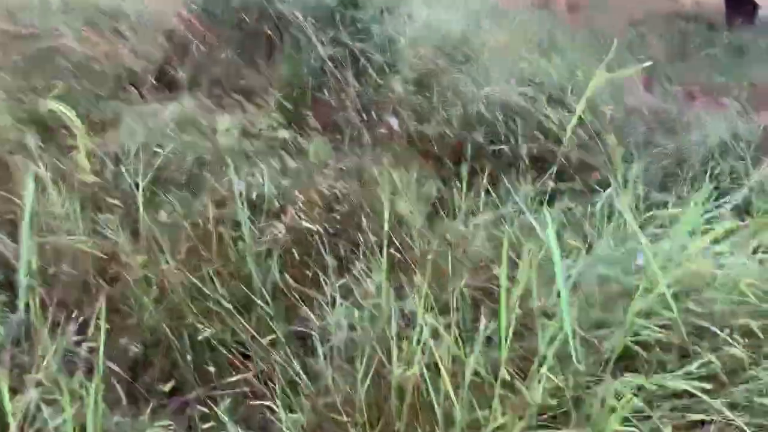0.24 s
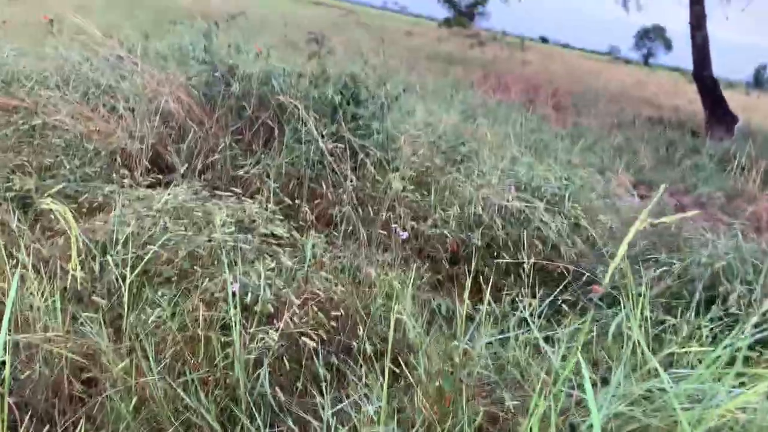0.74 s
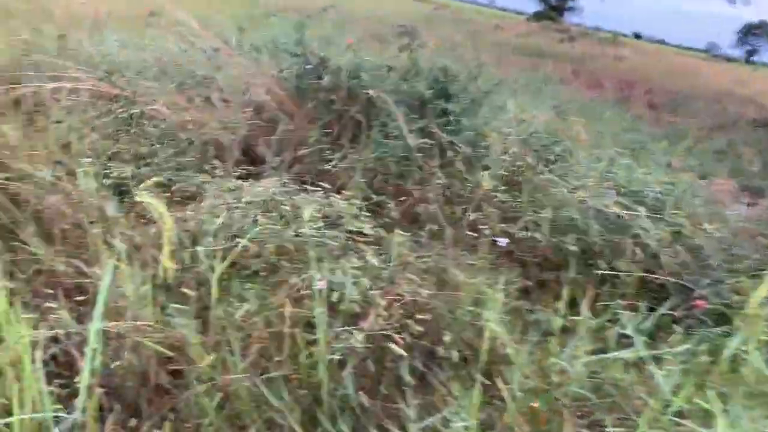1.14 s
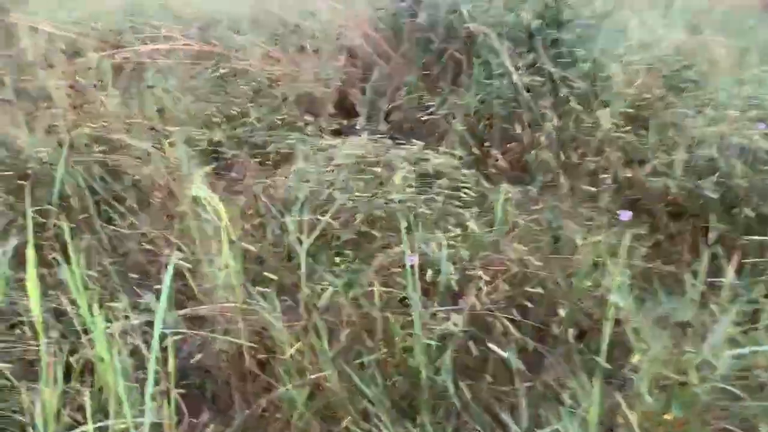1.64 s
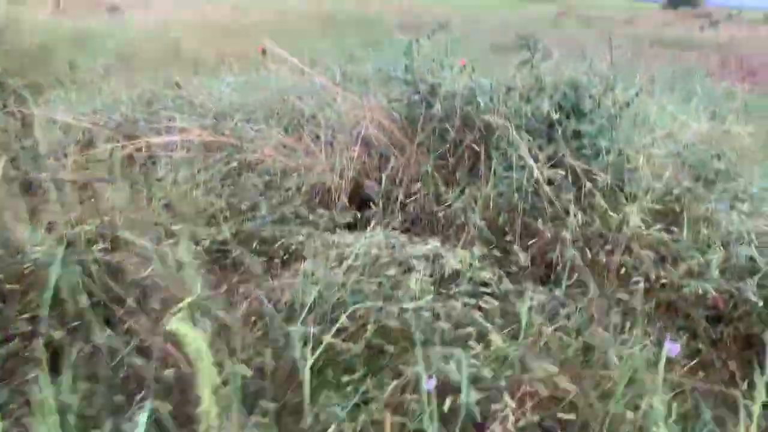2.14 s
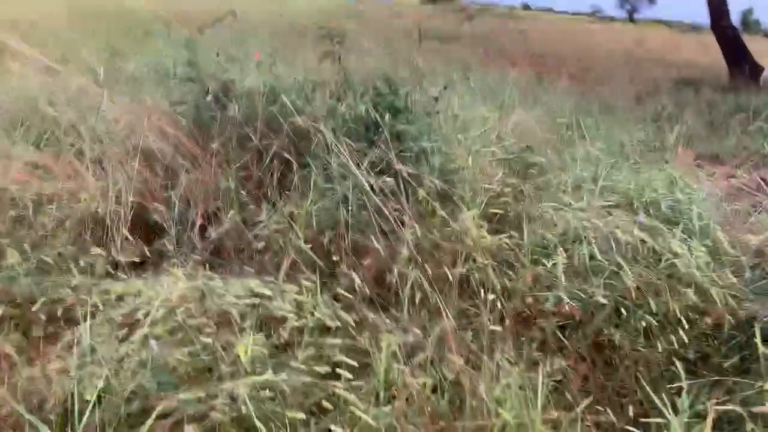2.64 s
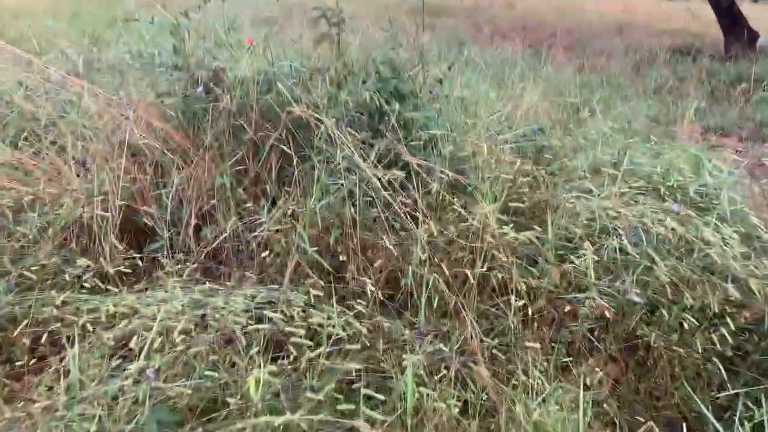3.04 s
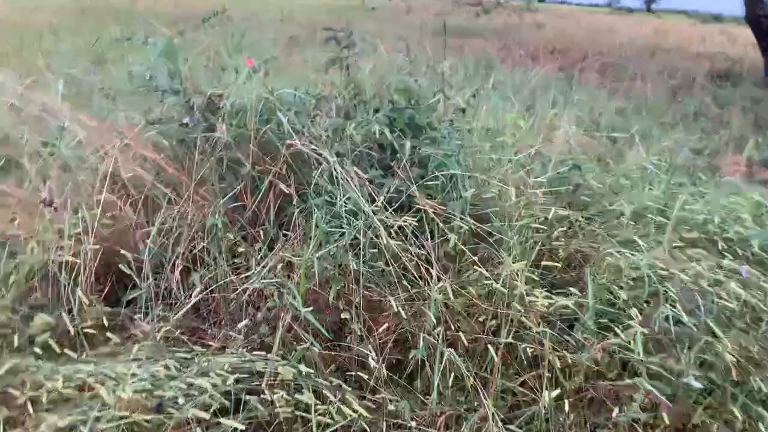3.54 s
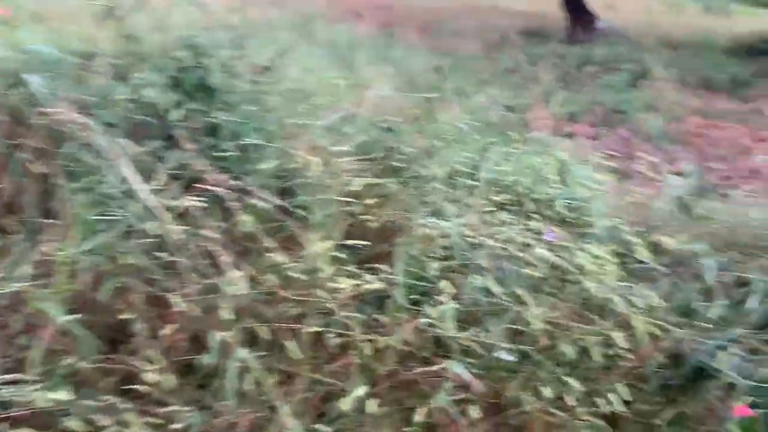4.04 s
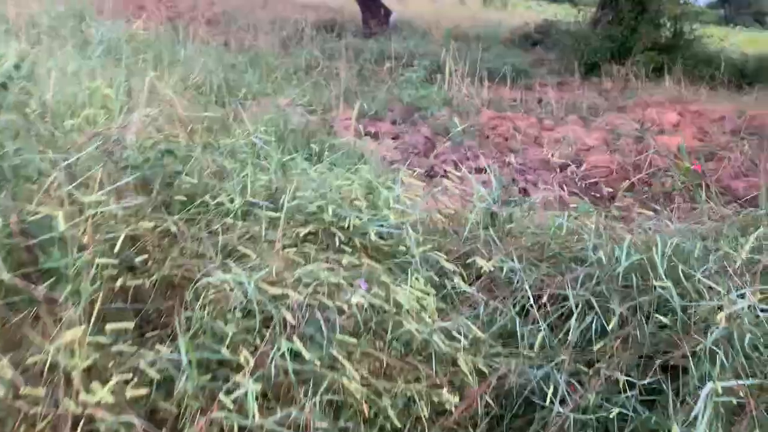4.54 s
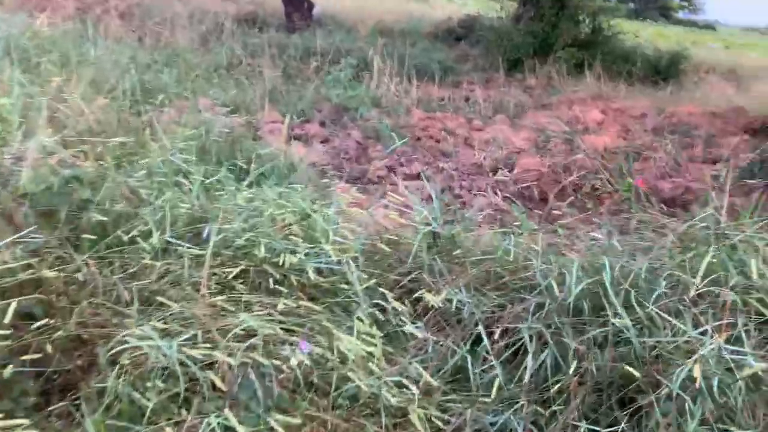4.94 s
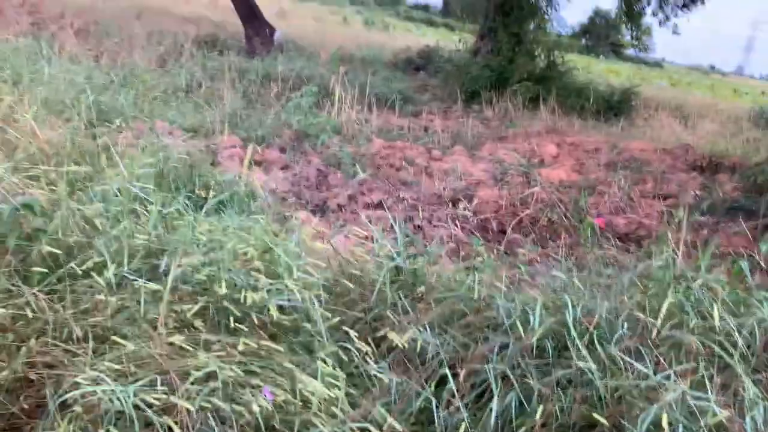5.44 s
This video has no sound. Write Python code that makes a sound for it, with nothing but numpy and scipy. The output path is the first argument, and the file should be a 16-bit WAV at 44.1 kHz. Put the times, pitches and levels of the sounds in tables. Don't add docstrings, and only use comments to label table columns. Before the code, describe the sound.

Dry grass brushes and crackles around a walker's legs over low wind rumble, hollow handling thumps, a quick cricket and faint insect drone.

```python
import sys
import numpy as np
from scipy import signal
from scipy.io import wavfile
from scipy.ndimage import uniform_filter1d

SR = 44100
rng = np.random.default_rng(int(sys.argv[2]) if len(sys.argv) > 2 else 0)


def elevation(decibels):
    levels = np.asarray(decibels, float)
    return 10 ** (levels / 20)


def materialize(psi):
    bounded = np.clip(np.atleast_2d(psi).T, -1, 1)
    quanta = np.round(bounded * 32767).astype(np.int16)
    wavfile.write(sys.argv[1], SR, quanta)


N = 250488

# peak time in seconds, level in dB, rise in seconds,
# fall in seconds, stalk level over it in dB.
SWISHES = [(0, -76.5, 0.14, 0.91, 6.5), (.26, -79.5, 0.23, 0.87, 4), (0.958, -59.5, 0.26, 0.39, -3),
           (1.015, -57.5, 0.13, 0.37, -5), (1.14, -63.5, .2, 0.99, -0.5), (1.501, -72, 0.042, 0.14, 24.5),
           (1.848, -74.5, 0.48, 0.31, 3), (2.101, -71, 0.42, 0.13, 11), (2.138, -47.5, 0.052, 0.14, -2),
           (2.46, -61.5, 0.21, 0.21, 10.5), (2.68, -74.5, 0.78, 0.73, 3.5), (2.82, -67, 0.073, 0.3, -10),
           (3.019, -66, 0.091, 1, 0), (3.24, -66, 1, 0.22, 4.5), (3.31, -67, 0.1, 0.17, 7.5),
           (3.48, -70, 0.12, 0.17, 8.5), (3.62, -76.5, 0.13, 0.43, 2), (3.92, -72.5, 0.16, 0.046, 5),
           (4.0, -75.5, 0.11, 0.22, 7.5), (4.141, -66, 0.31, 0.61, 4), (4.3, -72.5, 0.22, 0.18, -19),
           (4.44, -77.5, 0.074, 0.18, 3.5), (4.621, -76, 0.27, 0.18, 6.5), (4.982, -78.5, 0.61, 1, 4.5),
           (5.67, -84, 0.11, 0.09, 10.5)]
# peak time in seconds, level in dB, fall in seconds.
WHIPS = [(0.535, -65, 0.016), (1.922, -68, 0.017), (4.605, -62, .02), (0.64, -52.5, 0.032),
         (1.238, -58, 0.25), (1.5, -49.5, 0.18), (2.118, -52, 0.018), (2.124, -39.5, 0.058),
         (.05, -68, .03), (.198, -69.5, .02), (3.563, -62, .02), (.9, -61.5, .5), (1.15, -62, .4),
         (1.615, -60, .04), (2.14, -47, 0.21), (2.795, -53, 0.033)]
# frequency in Hz, width in Hz, level in dB.
STALK_MODES = [(1647, 1830, 14.54), (837, 1500, 11.7)]
BLADE_MODES = [(2520, 1100, -2), (4266, 1400, 0.06)]
LEAF_MODES = [(8880, 1600, 2.9), (11110, 940, 12.4), (6580, 5500, 11.8)]
# start in seconds, length in seconds, level in dB,
# pitch in Hz, end pitch over start pitch as a ratio.
RASPS = [(.97, 0.086, -60, 3500, 1.1), (.99, .06, -62, 2600, 1.4), (2.135, 0.074, -67, 3100, 1.14),
         (2.13, 0.072, -60.5, 4240, 1), (2.778, 0.016, -52, 1400, 1.14), (3.045, .045, -67, 1420, 0.78),
         (3.105, 0.118, -62.5, 1450, 1.23), (3.28, 0.066, -57.5, 1390, 1.2), (4.04, .09, -67, 1120, 1.37),
         (4.085, 0.046, -72, 4200, 1), (4.14, .13, -66.5, 1780, 0.9), (4.17, 0.069, -66.5, 2650, 0.98),
         (1.5, 0.11, -61, 2040, 0.91), (0.7, .03, -70, 1120, .9), (3.803, 0.04, -68, 1340, 1),
         (2.42, .07, -57, 1380, 1.12), (0.015, 0.026, -68.5, 1430, 1.02), (.594, .02, -71, 1300, 1),
         (1.606, .025, -62, 1300, 0.9), (1.801, .025, -65, 1420, 1), (4.453, 0.032, -61.5, 1320, 0.88),
         (4.6, .03, -63, 1200, 1), (1.52, .07, -66, 2600, .95), (2.122, 0.019, -59, 1670, 1.2)]
# start in seconds, length in seconds,
# level in dB, pitch in Hz, end pitch over start pitch as a ratio.
STUBBLE = [
    (1.495, 0.082, -55, 3400, 0.95),
    (1.495, 0.093, -61, 2500, 0.86),
    (2.125, 0.12, -53, 1140, 0.96),
    (2.125, .08, -56, 2400, 0.97),
]
# time in seconds, peak in dB, stem ring in Hz, fizz level over it in dB.
SNAPS = [(0.2458, -48, 2540, -32), (0.6365, -49, 4520, -2), (1.2344, -51, 1710, 0),
         (1.3478, -40, 1560, -16), (1.387, -54, 4500, 0), (1.615, -54, 1200, -1), (0.8916, -55, 3640, -14),
         (1.4924, -42, 1000, -10), (1.5, -42, 2050, -9), (2.1216, -41, 3460, -10), (2.1314, -40, 4080, -8),
         (2.4234, -43, 1420, -20), (2.4364, -33, 1500, -28), (2.7916, -39, 1260, -10),
         (2.7954, -36, 1180, -5), (2.8094, -44, 3500, -3), (2.8105, -44, 1200, -20),
         (2.8025, -52, 1500, -4), (2.8194, -47, 1530, -12), (2.8314, -51, 1540, -10),
         (2.9736, -56, 1020, -2), (3.0227, -52, 1520, -18), (3.0546, -50, 1430, -18),
         (3.1078, -49, 1450, -14), (3.2322, -49, 2040, -18), (3.2816, -47, 1270, -20),
         (3.476, -49, 3200, -16), (3.533, -59, 4300, -12), (2.792, -46, 3800, -20),
         (2.7958, -45, 3600, -20), (3.248, -38.5, 1390, -25), (3.2482, -48, 3300, -20),
         (3.2999, -38, 1500, -23), (3.3114, -41, 1250, -19), (3.3648, -40, 1430, -26),
         (3.4695, -49, 1450, -16), (3.5633, -52, 1570, -7), (3.9973, -48, 1010, -24),
         (4.0104, -51, 2140, -19), (4.3006, -48, 1610, -18), (4.3221, -43, 1780, -18),
         (4.6324, -51, 1660, -20), (4.6808, -59, 2330, -21), (5.0868, -57, 2460, -19)]
# frequency in Hz, width in Hz, level in dB.
FIZZ_MODES = [(7600, 3600, 0), (11900, 1500, -7)]
# time in seconds, jolt peak in dB, jolt pitch in Hz, jolt 60 dB decay in seconds,
# crunch level in dB.
STEPS = [
    (1.4975, -31.5, 86, 0.14, -47),
    (2.1255, -29, 104, 0.08, -47.5),
    (2.402, -43, 88, 0.21, -71),
]
# delay in seconds, one per footfall.
CRUNCH_LAGS = [.00014, .0003, .0002]
# frequency in Hz, width in Hz, level in dB.
CRUNCH_MODES = [(972, 89, 10), (2000, 250, 5), (3540, 1800, 4), (4870, 1700, -4), (8400, 720, 1.5)]
# frequency in Hz, width in Hz, level in dB.
CASE_MODES = [(508, 31.3, 4.5), (622, 77.5, -1.5), (900, 153, -10), (370, 140, -9.5), (1422, 72, -16)]
# time in seconds, peak in dB, palm mode over it in dB,
# left minus right in dB, contact in seconds.
KNOCKS = [(0.018, -34.5, 1, 8.5, 0.0089), (0.596, -34, -2, 0, 0.013), (1.047, -26, -20, 0, 0.015),
          (1.136, -48, -31, -6, 0.014), (1.391, -44, 1, 5, 0.045), (1.492, -27.5, -5, -4, 0.008),
          (1.605, -34, -2.5, 1.5, 0.024), (1.773, -50, -18, 2, 0.018), (1.8, -29.5, -14, 2.5, 0.026),
          (1.993, -40.5, -25, 4, .0063), (2.461, -46.5, -1, 6, 0.035), (2.49, -34, 5.5, -0.5, 0.017),
          (3.382, -41.5, 3, 3, 0.023), (3.472, -46, -7, 28, 0.018), (3.543, -45.5, -6, 19, 0.0048),
          (3.804, -33, -16, 0, 0.015), (3.905, -36.5, -12, 1, 0.0034), (4.093, -29.5, -8.5, 2, 0.0096),
          (4.187, -52, -13, 12, .012), (4.454, -30, 1.5, 0.5, 0.022), (4.71, -66, 0, 15, 0.041),
          (5.451, -52.5, 2, -4, 0.017)]
# time in seconds, peak in dB, finger mode over it in dB,
# left minus right in dB, contact in seconds.
TAPS = [
    (2.121, -32, -1, -6, 0.028),
    (2.668, -46.5, 12, 9, 0.028),
    (2.723, -44, 4.5, -9, 0.014),
    (2.778, -46, 31, 4, 0.013),
    (3.148, -43, -15, 5, 0.0071),
]
# time in seconds, level in dB, palm mode over it in dB,
# palm mode in Hz, length in seconds.
RUBS = [(0.204, -53.5, -1, 256.7, 0.07), (1.5, -62.5, 2.5, 244, 0.039), (2.123, -68.5, 1, 280, 0.09),
        (3.142, -61.5, 1.5, 370, 0.074), (3.397, -62, -3.5, 273, 0.17), (3.458, -71, 9.5, 267, 0.031),
        (3.806, -60, -4.5, 248, 0.094), (4.114, -64, -5.5, 238, 0.13)]
# time in seconds, level in dB.
GRIP = [(0.0, -54.5), (0.25, -67.5), (0.65, -63.5), (1.09, -63), (1.63, -54), (1.8, -74), (2.02, -56),
        (2.2, -59.5), (2.75, -59.5), (2.86, -70), (3.08, -65), (3.37, -59.5), (3.53, -77), (3.78, -59),
        (3.99, -68), (4.65, -62.5), (5.68, -68)]
# time in seconds, level in dB.
CRICKET = [(0.0, -82), (0.28, -67.5), (0.88, -78), (1.14, -75), (1.57, -73.5), (2.01, -68.5), (2.64, -77),
           (2.88, -65), (3.35, -73.5), (4.22, -70), (5.68, -76.5)]
# time in seconds, level in dB.
GUSTS = [(0.0, -51), (0.52, -48.5), (0.7, -50), (1.58, -49), (2.09, -50), (2.97, -48.5), (3.45, -50.5),
         (3.84, -48), (4.13, -50), (4.75, -50.5), (5.39, -48), (5.68, -49)]
# frequency in Hz, density in dB per Hz.
WIND_SPECTRUM = [(11, -64.5), (18, -43), (35, -8.5), (65, 0), (168, -12.5), (196, -18.5), (234, -15.5),
                 (426, -36), (516, -36), (1060, -74), (1200, -95), (1560, -107), (2640, -120)]
# time in seconds, level in dB, left minus right in dB.
CHORUS = [(0.0, -62.5, 6), (0.35, -60, -5), (0.84, -63.5, 1), (1.17, -60.5, -1), (1.64, -61, 2.5),
          (2.47, -62, -0.5), (2.82, -57.5, -8), (3.13, -60.5, -2.5), (3.45, -63, 3), (3.64, -59.5, -5),
          (4.06, -64, 3.5), (4.75, -65.5, 1.5), (5.68, -65, 1)]
# frequency in Hz, width in Hz, level in dB.
CHORUS_MODES = [(6780, 870, 7), (7330, 740, 7)]
# frequency in Hz, density in dB per Hz.
FIELD_SPECTRUM = [(410, -24), (700, -30), (963, 2.5), (1060, -5.5), (1220, -40), (1440, -3), (2050, -4.5),
                  (3030, -13), (3490, -8.5), (5350, -22), (6160, -7), (7020, -10.5), (8380, -7.5),
                  (10000, -28), (11800, -7.5), (15300, -65), (22000, -120)]
# frequency in Hz, left minus right in dB.
FIELD_LEAN = [(60, -2), (140, -33), (350, -4), (840, 9), (2010, -2), (4840, 5), (11700, -13)]
# frequency in Hz, width in Hz, level in dB.
RIGHT_CAVITY = (8430, 1250, 0)
# frequency in Hz, difference minus sum in dB.
PORT_PAIR = [(9200, 1.5), (9800, 0), (10800, 0), (11200, 11)]
# frequency in Hz, limit over the usual band level in dB.
SILENT_BELOW = [(500, -35), (1000, -8.5), (2500, -4), (4500, -1.5), (5000, 3), (5450, 8), (5800, -20), (7420, -27),
                (7690, 2.5), (7990, -1.5), (8290, -18), (10800, -41), (11500, 10), (11800, 40)]


def read(points, hz):
    f, value = np.transpose(points)
    return np.interp(np.log(hz + 1), np.log(f + 1), value)


def curves(rows):
    s, *columns = np.transpose(rows)
    return [np.interp(np.arange(N) / SR, s, column) for column in columns]


def evened(x):
    return x / np.sqrt(np.mean(x ** 2) + 1e-20)


def add(mix, s, sound):
    part = mix[..., round(s * SR):][..., :sound.shape[-1]]
    part += sound[..., :part.shape[-1]]


def sides(x, lean_db, lag=0):
    left = np.roll(x, round(lag * SR)) * elevation(lean_db / 2)
    right = x / elevation(lean_db / 2)
    return np.array([left, right])


def ring(x, modes):
    out = 0
    for k, (hz, width, db) in enumerate(modes):
        resonator = signal.iirpeak(hz, hz / width, SR)
        out = out + (-1) ** k * elevation(db) * signal.lfilter(*resonator, x)
    return out


def wander(per_s):
    size = max(int(SR / per_s / 2), 1)
    return evened(uniform_filter1d(uniform_filter1d(rng.standard_normal(N), size), size))


def noise(spectrum, same, patchy_db, lean, size):
    hz = np.fft.rfftfreq(size, 1 / SR)
    a, b, c, d, patches = rng.standard_normal((4 * N // size + 5, len(hz), 5)).T
    patches = uniform_filter1d(patches, size=6, axis=0)
    patches = evened(uniform_filter1d(patches, size=6, axis=1))
    same = np.clip(same, 0, 1)
    left = a + 1j * b
    right = same * left + np.sqrt(1 - same ** 2) * (c + 1j * d)
    lean_db = np.multiply.outer([.5, -.5], read(lean, hz))[..., None]
    z = np.array([left, right]) * elevation(read(spectrum, hz)[:, None] + patchy_db * patches + lean_db)
    return evened(signal.istft(z, nperseg=size, noverlap=3 * size // 4)[1][:, :N])


def stroke(s, db, rise, fall):
    late = np.arange(0, N + 64, 64) / SR - s
    return elevation(2 * (db - 28 * np.maximum(-late / rise, late / fall)))


def summed(powers):
    rest_db = -89
    return np.repeat(10 * np.log10(sum(powers) + elevation(2 * rest_db)), 64)[:N]


def brush():
    passes = [stroke(*row[:4]) for row in SWISHES]
    blade_db = summed(passes)
    stalk_db = summed([p * elevation(2 * row[4]) for p, row in zip(passes, SWISHES)])
    trailing = elevation(2 * -7) * sum(passes) ** 0.88
    whips = [stroke(s, db, 0.016, fall) for s, db, fall in WHIPS]
    leaf_db = summed([trailing] + whips)
    # modes, level in dB, likeness of the ports, share of grains
    layers = ((STALK_MODES, stalk_db, .9, .9), (BLADE_MODES, blade_db, .96, .8), (LEAF_MODES, leaf_db, .4, .45))
    out = np.zeros((2, N))
    for modes, level_db, same, grainy in layers:
        size = elevation(2.1 * np.minimum(rng.exponential(1, N), 4))
        grains = size * (rng.random(N) < 600 / SR) * rng.standard_normal(N)
        near = grainy * evened(grains) + rng.standard_normal(N)
        other = same * near + np.sqrt(1 - same ** 2) * rng.standard_normal(N)
        rung = ring(ring(np.array([near, other]), modes), modes)
        out += evened(rung) * elevation(level_db + 2.05 * wander(23))
    t = np.arange(N) / SR
    dip = sum(np.interp(t, [s - .05, s - .02, s + .06, s + .14], [0, 1, 1, 0]) for s, *_ in STEPS[:2])
    lean_db = np.array([[-.5], [.5]]) * (1 + 4 * dip)
    return out * elevation(lean_db) * elevation(-9 * dip)


def rasps():
    out, t = np.zeros((2, N)), np.arange(8000) / SR
    rows = [(1, *row) for row in RASPS] + [(-1, *row) for row in STUBBLE]
    for (sign, s, length, db, hz, glide), draw in zip(rows, rng.standard_normal((len(rows), 3, 8000))):
        bursts = uniform_filter1d(1. * (abs(draw[1]) > 2.6), size=12)
        slips = draw[0] * (1 + 70 * bursts)
        pitch = hz * (1 + (glide - 1) * np.minimum(t / length, 1.2))
        turn = np.exp(2j * np.pi * np.cumsum(pitch) / SR)
        r = np.exp(-np.pi * 0.24 * hz / SR)
        rung = turn * signal.lfilter([1], [1, -2 * r, r * r], (slips + 0.49 * draw) / turn)
        rung = evened(rung.real[[0, 2]])
        touch = np.clip(t / 0.0036, 0, 1) * np.clip((length - t) / 0.046 + .5, 0, 1) ** 2
        add(out, s, elevation(db) * touch * rung * [[sign], [1]])
    return out


def snaps():
    out, t = np.zeros((2, N)), np.arange(6000) / SR
    for (s, db, hz, fizz_db), puff in zip(SNAPS, rng.standard_normal((len(SNAPS), 6000))):
        tick = 9 * (np.arange(len(t)) == 0)
        puff = tick + puff * elevation(-60 * t / .012)
        stem = ring(puff, [(hz, 0.26 * hz, 0), (3600, 2600, -13), (800, 500, -8)])
        fizz = ring(puff, FIZZ_MODES)
        crack = stem / abs(stem).max() + elevation(fizz_db + 5) * fizz / abs(fizz).max()
        add(out, s + .0008, sides(elevation(db + 3) * crack, -1.5))
    return out


def footfalls():
    out, t = np.zeros((2, N)), np.arange(16000) / SR
    for (s, db, hz, t60, crunch_db), lag in zip(STEPS, CRUNCH_LAGS):
        swing = np.sin(2 * np.pi * hz * t) * np.minimum(t / 0.005, 1) * elevation(db - 60 * t / t60)
        heel = 2.8 * elevation(db) * np.exp(-((t - .003) / 0.001) ** 2)
        add(out, s + 0.00673, sides(swing + heel, -2.5, 0.0014))
        size = np.minimum(rng.exponential(1, len(t)), 3) * (rng.random(len(t)) < .05)
        stubble = rng.standard_normal(len(t)) * elevation(7.9 * size)
        crunch = evened(ring(ring(stubble, CRUNCH_MODES), CRUNCH_MODES))
        add(out, s - .004, sides(crunch * elevation(crunch_db - 60 * t / 0.4), -2.4, lag))
    return out


def case(drive, palm_db, palm_hz, lean_db):
    drive = signal.sosfilt(signal.butter(3, 1600, fs=SR, output="sos"), drive)
    palm = [(palm_hz, 70, 0)]
    low = elevation(palm_db) * evened(ring(ring(drive, palm), palm))
    shell = evened(ring(drive, CASE_MODES))
    return sides(shell, lean_db, .00039) + sides(low, lean_db, .0002)


def handling():
    out, t = np.zeros((2, N)), np.arange(12000) / SR
    palm_hz, finger_hz = 234.3, 393
    hits = [(palm_hz, *row) for row in KNOCKS] + [(finger_hz, *row) for row in TAPS]
    for (hz, s, db, palm_db, lean_db, contact), push in zip(hits, rng.standard_normal((len(hits), 12000))):
        push = 3.5 * (t < .0005) + push
        press = np.exp(-(t / contact) ** 2) * np.minimum(0.37 + t / 0.0021, 1)
        knock = case(push * press, palm_db, hz, lean_db)
        add(out, s, elevation(db) * knock / np.sqrt(abs(knock[0]).max() * abs(knock[1]).max()))
    for (s, db, palm_db, hz, length), push in zip(RUBS, rng.standard_normal((len(RUBS), 12000))):
        touch = np.clip(t / 0.003, 0, 1) * np.clip((length - t) / 0.036 + .5, 0, 1)
        rub = case(push * touch, palm_db, hz, 0.94) * np.sqrt(t[-1] / length)
        add(out, s, elevation(db + 1.5) * rub)
    creak = case(rng.standard_normal(N) * elevation(2.9 * wander(25)), -8.5, 248, 0.27)
    return out + elevation(curves(GRIP)[0] - 3.0) * creak


def cricket():
    beats_per_s, first_beat = 146.13, .37
    rests = np.tile([3, 3, 4], 67)[:200]
    gaps = [[2] * (2 + (extra < .12)) + [rest] for rest, extra in zip(rests, rng.random(200))]
    beats = (np.cumsum(np.concatenate(gaps)) + first_beat) / beats_per_s
    beats = beats + .0003 * rng.standard_normal(len(beats))
    at = (beats[beats < N / SR] * SR).astype(int)
    train = np.zeros(N)
    train[at] = elevation(1.4 * rng.standard_normal(len(at)))
    t = np.arange(round(0.0077 * SR)) / SR
    hz = 5950 + 900 * t / t[-1]
    chirp = np.sin(2 * np.pi * np.cumsum(hz) / SR) * (t / .0018) * np.exp(-t / 0.0036)
    song = evened(np.roll(signal.oaconvolve(train, chirp)[:N], -80))
    level_db = curves(CRICKET)[0]
    lean_db = -9 + (level_db + 69.5)
    return sides(elevation(level_db - 1.0) * song, lean_db)


def wind():
    rumble = noise(WIND_SPECTRUM, 0.99, 0.97, [(50, 0.13), (500, 0.27)], size=2048)
    swell = np.sqrt(uniform_filter1d((rumble ** 2).mean(0), size=7000))
    return elevation(curves(GUSTS)[0] + 4.0 + 1.03 * wander(22)) * rumble / swell


def whistle():
    rung = ring(ring(rng.standard_normal(N), CHORUS_MODES), CHORUS_MODES)
    return evened(rung) * elevation(2.27 * wander(24))


def field():
    level_db, lean_db = curves(CHORUS)
    left = whistle() * elevation(lean_db / 2)
    right = whistle() / elevation(lean_db / 2)
    chorus = elevation(level_db - 2.5) * np.array([left, right])
    hiss = noise(FIELD_SPECTRUM, 0.049, 1.4, FIELD_LEAN, size=512)
    return chorus + elevation(-64 - 7.5) * hiss


def scene():
    return brush() + rasps() + snaps() + footfalls() + handling() + cricket() + wind() + field()


def thin_faint_bands(ports):
    pair = np.array([ports[0] + ports[1], ports[0] - ports[1]]) / 2
    hz, _, z = signal.stft(pair, SR, nperseg=1024, noverlap=768)
    z = z * elevation(np.multiply.outer([-.5, .5], read(PORT_PAIR, hz)))[..., None]
    band = np.arange(len(hz)) // 7
    band_hz = hz[::7]
    power = np.add.reduceat(abs(z) ** 2, np.arange(0, len(hz), 7), axis=1)
    power = uniform_filter1d(power, size=5)
    level_db = 10 * np.log10(abs(power) + 1e-20)
    median_db = np.median(level_db, axis=2, keepdims=True)
    louder_db = level_db.max(axis=0)
    whim_db = 6.5 * evened(uniform_filter1d(rng.standard_normal(power.shape), size=11))
    usual_db = median_db + read(SILENT_BELOW, band_hz + 150)[:, None]
    masked_db = louder_db - 10.5 - 30 * (band_hz < 900)[:, None]
    shut = level_db + whim_db < np.maximum(usual_db, masked_db)
    burst = level_db > median_db + 13
    shut = shut & ~(burst & (level_db == louder_db))
    mid, side = signal.istft(z * ~shut[:, band], SR, nperseg=1024, noverlap=768)[1][:, :N]
    return np.array([mid + side, mid - side])


def band_limit(x):
    return signal.sosfilt(signal.butter(12, 12260, fs=SR, output="sos"), x)


def record(dry):
    ports = np.array([dry[0], dry[1] + ring(dry[1], [RIGHT_CAVITY])])
    ports = signal.sosfilt(signal.butter(2, 40, "high", fs=SR, output="sos"), ports)
    edge = signal.firwin(301, 12400, window=("kaiser", 8), fs=SR)
    ports = signal.oaconvolve(ports, edge[None], "same")
    return band_limit(thin_faint_bands(ports))


dry = scene()
out = record(dry)
materialize(out)
```